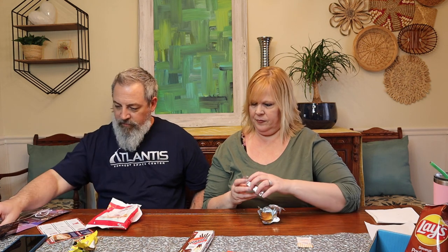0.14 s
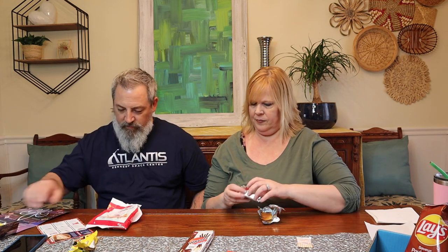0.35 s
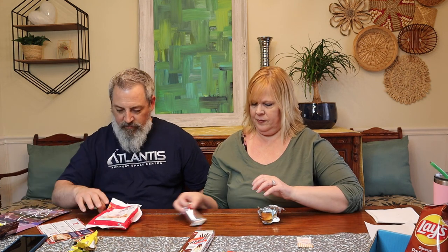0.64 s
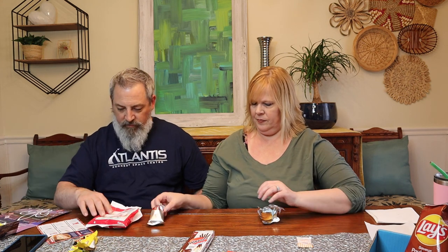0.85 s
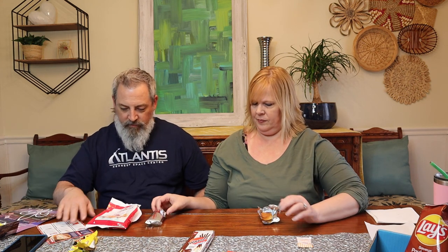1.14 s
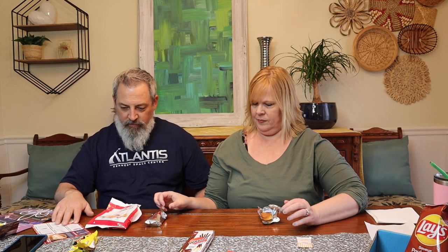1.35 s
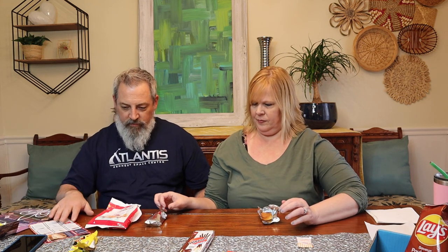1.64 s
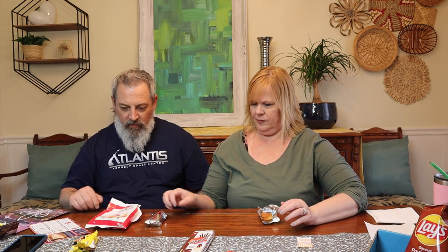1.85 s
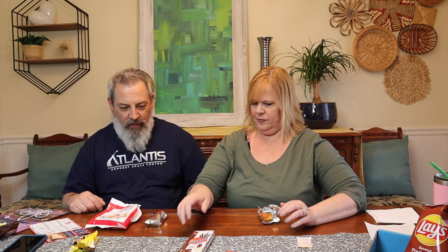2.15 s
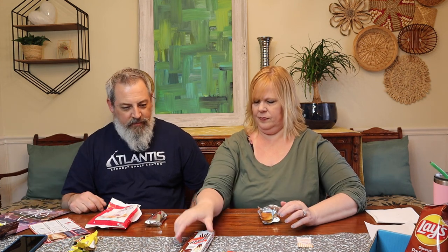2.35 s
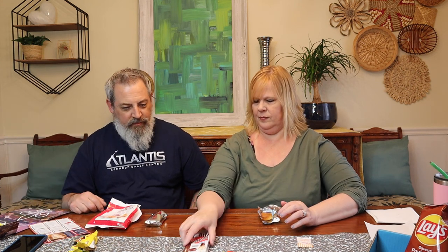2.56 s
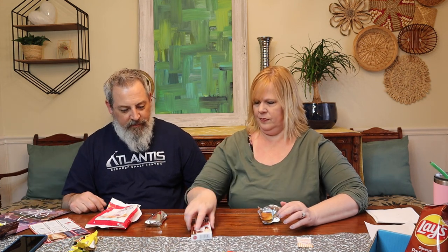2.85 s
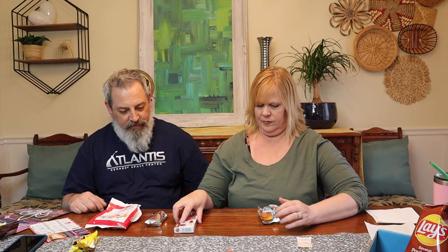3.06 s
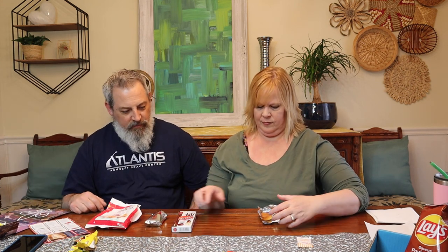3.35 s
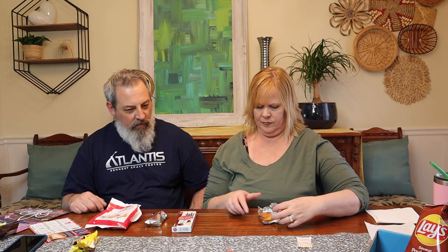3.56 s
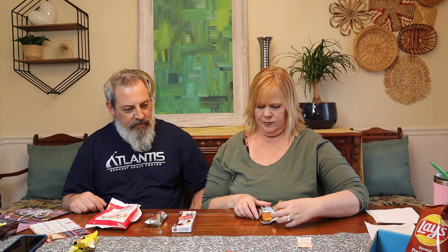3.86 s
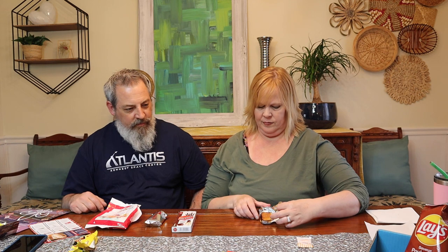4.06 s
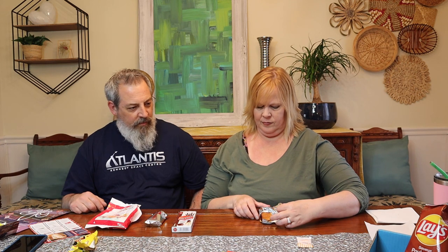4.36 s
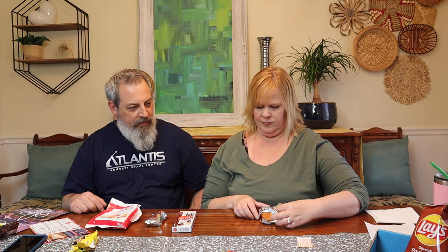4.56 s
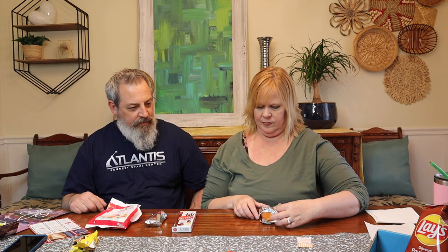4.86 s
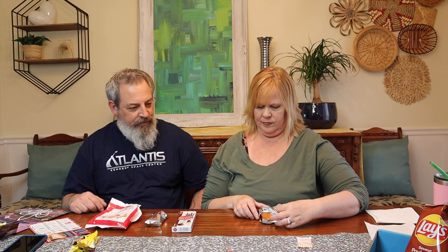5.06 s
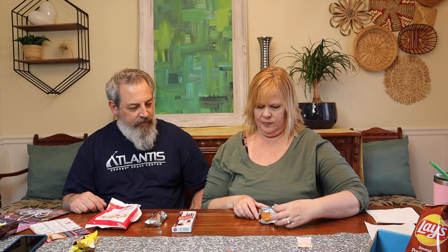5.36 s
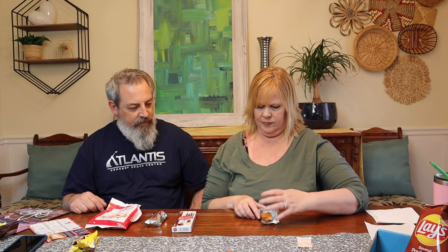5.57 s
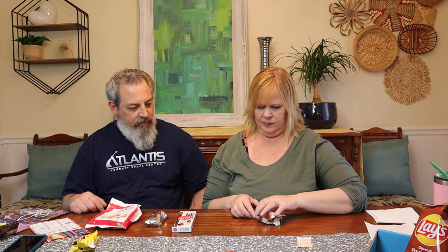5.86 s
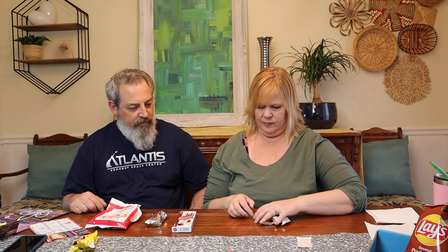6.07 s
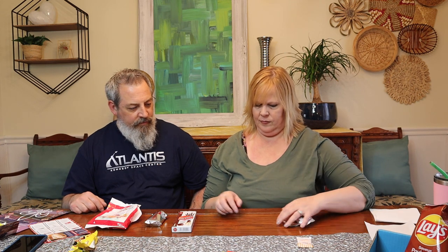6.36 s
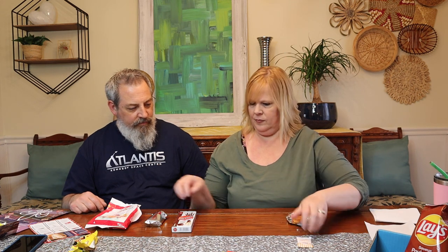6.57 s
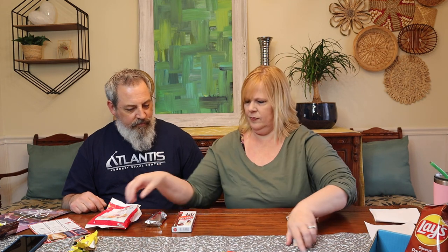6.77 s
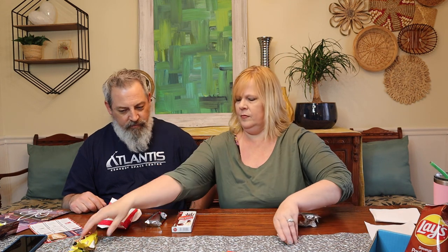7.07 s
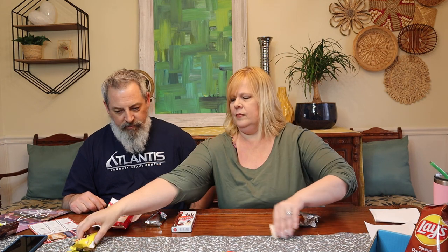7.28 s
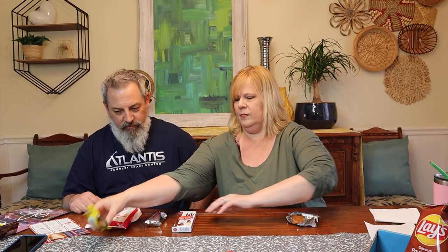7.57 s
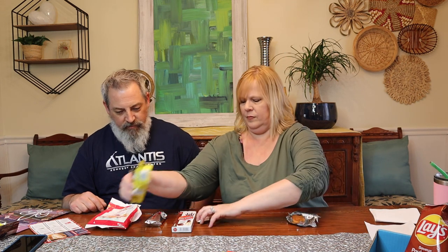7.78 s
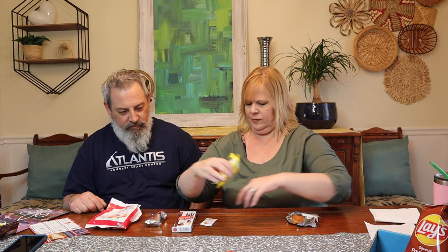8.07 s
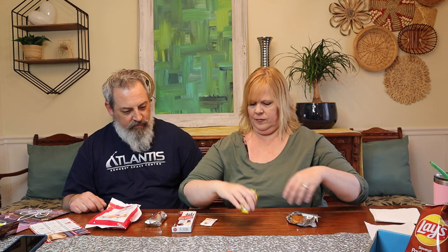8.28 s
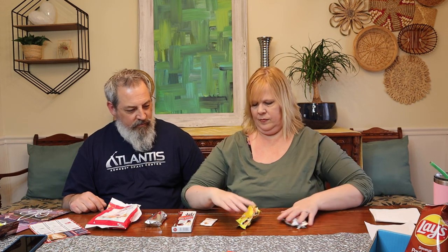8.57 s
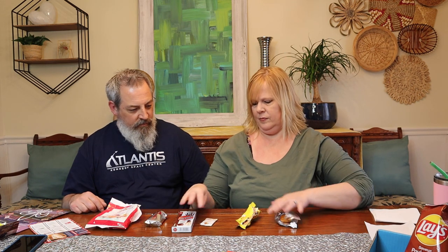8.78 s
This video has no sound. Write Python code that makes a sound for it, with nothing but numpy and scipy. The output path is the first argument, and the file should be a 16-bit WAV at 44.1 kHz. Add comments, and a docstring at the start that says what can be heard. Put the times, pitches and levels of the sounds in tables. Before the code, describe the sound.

Foil and plastic snack wrappers crackle and snap in bursts at a wooden table, with small thuds, a packet slide and quiet room hum.

```python
"""Snack wrappers of plastic and foil are handled at a wooden table, a few steps from a mono microphone.
Creases snap as short ringing facets over a crackle of filtered noise bursts; taut foil rings on faintly.
Packets slide as dense friction grains, and packets and hands land on the table top, ringing its modes.
The small room answers with echoes and a noise tail; mains hum and ventilation stay underneath."""
import sys
import numpy as np
from scipy import signal
from scipy.fft import rfft, irfft, next_fast_len
from scipy.io import wavfile
from scipy.ndimage import map_coordinates

SR = 44100
rng = np.random.default_rng(int(sys.argv[2]) if len(sys.argv) > 2 else 0)


def waveform_to_disk(signal):
    """Save audio, clipped to [-1, 1], as 16-bit WAV at the path in sys.argv[1]."""
    frames = np.transpose(np.atleast_2d(signal))
    scaled = np.clip(frames, -1, 1) * 32767
    samples = np.round(scaled).astype(np.int16)
    wavfile.write(sys.argv[1], SR, samples)


N = 392931

# spectrum of the wrapper sheet: f/Hz, level/dB
FILM_SPECTRUM = [(700, -11.5), (1400, -2), (2400, -1), (3400, 1.5), (4300, -4), (5200, -4), (6500, -22.5),
                 (8000, -52)]
# spectrum of the wrapper's treble: f/Hz, level/dB
CRISP_SPECTRUM = [(5000, 0), (7000, -5), (10000, -6), (14500, -7.5), (15700, -18), (16200, -45)]
# spectrum of the packet body, also heard from the table under a slide: f/Hz, level/dB
BODY_SPECTRUM = [(150, -11.5), (300, -4.5), (450, 1.5), (650, 2.5), (830, 5.5), (1050, 0), (1500, -18)]
# spectrum of a dragged surface, also of the edge of a landing: f/Hz, level/dB
DRAG_SPECTRUM = [(900, -8), (1300, 1), (3600, 0.5), (4400, -4.5), (5000, -1), (6500, -12), (12300, -16.5),
                 (15700, -22), (16000, -60)]


def amp(db):
    """Gain of a dB value."""
    return 10 ** (np.asarray(db) / 20)


def unit(x):
    """Scaled to rms 1."""
    return x / np.sqrt(np.mean(x ** 2) + 1e-20)


def peak(x):
    """Scaled to peak 1."""
    return x / np.abs(x).max()


def noise():
    """White noise for the whole scene."""
    return rng.standard_normal(N)


def along(points, hz):
    """Values read between (f/Hz, value) points on a log frequency axis."""
    f, v = np.transpose(points)
    return np.interp(np.log(hz + 1), np.log(f + 1), v)


def curves(tables):
    """One value per sample for each column after the time; the first falls to -100 dB between tables."""
    rows = []
    for table in tables:
        first, last = np.array(table[0], float), np.array(table[-1], float)
        first[:2] = first[0] - .02, -100
        last[:2] = last[0] + .02, -100
        rows += [first, *table, last]
    s, *columns = np.transpose(np.array(rows, float))
    return [np.interp(np.arange(N) / SR, s, column) for column in columns]


def wobble(rate):
    """A smooth random curve through rate random knots a second."""
    knots = rng.standard_normal(int(N * rate / SR) + 4)
    return map_coordinates(knots, [np.arange(N) * rate / SR])


def coloured(x, spectrum):
    """x through a (f/Hz, level/dB) spectrum, silent outside it, brought to rms 1."""
    m = next_fast_len(N + 8192)
    hz = np.fft.rfftfreq(m, 1 / SR)
    inside = (hz > spectrum[0][0]) & (hz < spectrum[-1][0])
    return unit(irfft(rfft(x, m) * amp(along(spectrum, hz)) * inside, m)[:N])


def crackle(count, spread_db, clump_db, bed_db, life):
    """Short noise bursts of uneven size and life seconds, in clumps, over a bed of noise."""
    at, chance = rng.random((2, count))
    size = amp(spread_db * np.minimum(-np.log(chance), 3))
    strikes = np.bincount((at * N).astype(int), size, N)
    bursts = signal.lfilter([1], [1, -np.exp(-1 / (life * SR))], strikes)
    return amp(clump_db * wobble(45)) * (unit(bursts) + amp(bed_db)) * noise()


def background():
    """Ventilation and microphone hiss, a slightly unsteady hum and a slow low rumble."""
    # ventilation and hiss: f/Hz, level/dB
    air_spectrum = [(44, -42), (75, -15), (107, -8.5), (251, -10), (314, -10), (481, -12.5), (673, -16),
                    (842, -11.5), (1350, -22), (3370, -26.5), (3770, -24), (4930, -27.5), (12400, -31.5),
                    (15800, -32)]
    rumble_spectrum = [(15, 0), (28, 0), (36, -8), (55, -14)]  # f/Hz, level/dB
    hum_hz = 60
    air = amp(-55.5 + 0.17 * wobble(3.1)) * coloured(noise(), air_spectrum)
    hum = amp(-54.5 + 0.9 * wobble(8.1)) * np.sin(2 * np.pi * hum_hz * np.arange(N) / SR)
    rumble = amp(-66 + 3 * wobble(2.5)) * coloured(noise(), rumble_spectrum)
    return air + hum + rumble


def room(x, wet_db):
    """Early echoes and a tail dying by frequency, weaker in the bass; the hands move, so it keeps changing."""
    # decay time of the tail: f/Hz, t60/s
    decay = [(100, 0.51), (500, 0.47), (1400, 0.47), (3700, 0.36), (7000, 0.29), (15000, 0.11)]
    # early echoes off the walls, each delay varied by up to a tenth: t/s, level/dB
    echoes = [(.0022, -15.5), (.0054, -31), (0.0113, -24)]
    out, step = np.zeros(N + 2 * SR), SR // 4  # a new answer every quarter second
    for start in range(0, N, step):
        hz, t, z = signal.stft(rng.standard_normal(SR // 2), SR, nperseg=256)
        hz = hz[:, None]
        tilt_db = 0.5 * np.log2(hz / 2000 + 0.23)
        tail = signal.istft(z * amp(tilt_db - 60 * t / along(decay, hz)), SR, nperseg=256)[1]
        tail = np.pad(amp(wet_db) * tail / np.linalg.norm(tail), (100, 0))  # starts 100 samples late
        for s, db in echoes:
            tail[round(s * SR * rng.uniform(.9, 1.1))] += amp(db)
        answer = signal.fftconvolve(x[start:start + step], tail)
        out[start:start + len(answer)] += answer
    return out[:N]


def slides():
    """Packet or arm dragged over the table: dense friction grains excite the surface and the table."""
    # one list of points a slide: t/s, hiss level/dB, table body level/dB over the hiss
    drags = [
        [(1.82, -83, -5.5), (1.93, -56, -13), (1.99, -52.5, 2), (2.1, -60, 1.5), (2.33, -68, -5)],
        [(2.53, -58.5, 5), (2.56, -50.5, -3), (2.7, -48.5, -4), (2.83, -43.5, -9), (2.9, -42.5, -6.5),
         (3.0, -42.5, -11), (3.05, -40, 2.5), (3.2, -54, 2)],
    ]
    hiss_db, body_db = curves(drags)
    grains = crackle(count=30000, spread_db=2.5, clump_db=.8, bed_db=4, life=.0003)
    hiss = coloured(grains, DRAG_SPECTRUM)
    table_body = amp(body_db) * coloured(grains, BODY_SPECTRUM)
    return amp(hiss_db) * (hiss + table_body)


def knocks():
    """Each landing rings the modes near its centre; its weight drives the low table modes, its edge cracks."""
    # things landing on the table: t/s, peak level of the ring/dB, centre of the excited modes f/Hz, weight/dB
    landings = [(0.0256, -20.5, 594, 19), (0.1277, -23, 864, 15), (.38, -27, 443, -27),
                (1.229, -22, 950, 3), (1.973, -37, 304, 14), (2.0203, -35, 260, 5), (2.046, -35.5, 150, -9),
                (2.086, -39.5, 170, -16), (2.831, -28, 517, -9), (2.845, -28, 700, -2),
                (3.012, -14, 724, 6), (3.0228, -22, 830, -19), (3.052, -25.5, 382, -12),
                (3.2287, -28, 523, -34), (4.036, -31, 1000, -22), (6.0291, -32, 850, -17),
                (6.7334, -32, 183, -33), (6.799, -39, 169, -13), (6.839, -40, 200, -3), (6.88, -40, 180, 2),
                (7.2329, -33.5, 870, -9), (7.32, -23.5, 796, -30), (7.497, -25.5, 650, -36),
                (7.5178, -25, 860, -29), (7.5948, -24, 970, -34), (8.4508, -9.5, 600, -18),
                (8.485, -22.5, 420, -13), (8.587, -26.5, 833, -8)]
    # modes of table top and packets, level and pitch varied a little each time: f/Hz, level/dB, t60/s
    modes = [(95, 3, 0.24), (146, 5, 0.06), (237, 5, 0.11), (306, -10, 0.23), (383.5, -2.5, 0.21),
             (463, 11.5, 0.048), (614.4, 5.5, 0.17), (687, 16, 0.033), (852, 20, 0.039), (979, 3, 0.15),
             (1254, 15.5, 0.026)]
    contact_cycles = 0.3  # build-up time constant, in cycles of the centre
    slap_db, slap_cycles = -4, 0.8  # first contact pushes the air once: level over the ring, length
    out, t = np.zeros(N), np.arange(SR // 4) / SR
    hz, level_db, t60 = np.transpose(modes)[..., None]
    sign = (-1) ** np.arange(len(modes))[:, None]  # neighbouring modes ring with opposite signs
    edge = coloured(noise(), DRAG_SPECTRUM)
    for s, db, centre_hz, weight_db in landings:
        at = round(s * SR)
        near_centre = amp(-9 * np.log2(hz / centre_hz) ** 2)
        low_modes = amp(weight_db - 9 * np.log2(hz / 250) ** 2)
        share = sign * (near_centre + low_modes) * amp(level_db + rng.normal(0, 2.5, hz.shape))
        detune = rng.normal(1, .02, hz.shape)
        ring = (share * amp(-60 * t / t60) * np.sin(2 * np.pi * hz * detune * t)).sum(0)
        ring = peak(ring * (1 - np.exp(-t * centre_hz / contact_cycles)))
        slap = np.sin(2 * np.pi * centre_hz * t) * np.exp(-(t * centre_hz / slap_cycles) ** 2)
        # higher-pitched landings crack louder
        crack_db = -11.5 + 13.5 * np.log2(centre_hz / 800) - 60 * t / 0.025
        crack = amp(crack_db) * edge[at:][:len(t)]
        out[at:][:len(t)] += amp(db) * (ring + crack + amp(slap_db) * slap)
    return out


def tings():
    """A flicked patch of foil holds one tone for a moment, its level flickering as it dies."""
    # taut foil: t/s, level/dB before the flicker, f/Hz, t60/s
    patches = [(4.445, -57, 3960, 0.18), (4.4445, -57, 4760, .15)]
    t, out = np.arange(N) / SR, np.zeros(N)
    for s, db, hz, t60 in patches:
        level = amp(db + 4 * wobble(60) - 60 * abs(t - s) / t60) * (t > s)
        out += level * np.sin(2 * np.pi * hz * (t - s))
    return out


def handling():
    """Gains over time of the sheet, its treble and the packet body; overlapping grips add in power."""
    # each grip on a wrapper: strongest at t/s, swell/s and fade/s across the grip range,
    # crackle level/dB, then crispness level/dB and packet body level/dB over the crackle
    grips = [(0.032, 0.0091, 0.12, -44, -25, 16.5), (0.138, 0.041, 0.052, -32.5, -15, 3),
             (0.249, 0.054, 0.14, -33.5, -8.5, -10), (0.33, 0.046, 0.08, -40.5, -7, -4),
             (0.425, 0.064, 0.17, -41, -18, -0.5), (0.505, 0.12, 0.15, -37, -7.5, -6.5),
             (0.652, .01, .15, -47, -16, -3), (0.704, 0.067, 0.11, -36.5, -12.5, -11.5),
             (0.863, 0.14, 0.29, -38.5, -10, -7), (1.055, 0.59, 0.24, -53.5, -12, -3),
             (1.1, 0.039, 0.28, -47.5, -9, -1.5), (1.235, 0.0067, 0.078, -39.5, -14, 8.5),
             (1.367, .15, 0.37, -53, -10, -5), (3.738, 0.097, 0.12, -49, -1.5, -9),
             (3.846, 0.088, 0.088, -47.5, -3, -7), (4.45, 0.044, 0.063, -55, -16, 4),
             (5.425, 0.019, 0.12, -43, -9, -6.5), (5.457, 0.033, 0.052, -40, -4, -15),
             (5.559, 0.24, 0.16, -54, -12, -3), (5.833, 0.025, .5, -49.5, -4.5, -4.5),
             (6.035, 0.2, .15, -44, -7, -4), (6.122, 0.1, 0.17, -42, -8, -3.5),
             (6.464, 0.46, 0.15, -44.5, -7.5, -8), (6.715, 0.012, 1, -53.5, -8, -4),
             (7.001, 0.49, 0.21, -51.5, -4.5, -5.5), (7.339, 0.11, 0.15, -37, -10.5, -4.5),
             (7.528, 0.061, 0.063, -41.5, -32, -1), (7.604, 0.061, 0.067, -46.5, -5, -10),
             (7.752, 0.042, 0.28, -45.5, -12, -5.5), (7.833, 0.087, .15, -48, -7, -3),
             (7.916, 0.037, 0.11, -39, -8.5, -22), (8.0, 0.088, 0.19, -48, -19, -4),
             (8.245, 0.17, 0.59, -61.5, -12, -3), (8.457, 0.0055, 0.053, -45.5, -15, 24),
             (8.5, 0.069, 0.36, -45, -9, -10), (8.589, 0.049, 0.25, -36.5, -7, -2.5),
             (8.78, .008, 0.059, -45, 3.5, -9), (8.796, 0.048, 0.066, -41.5, -10, -10)]
    grip_range_db = 20
    power, t = np.zeros((3, N)), np.arange(N) / SR
    for s, swell, fade, db, crisp_db, body_db in grips:
        away = np.maximum((s - t) / swell, (t - s) / fade)
        parts = amp([[0], [crisp_db], [body_db]])
        power += parts ** 2 * amp(db - grip_range_db * away) ** 2
    return np.sqrt(power)


def film(sheet, crisp, body):
    """Countless small folds crackle; each shakes the sheet, its treble and the packet body together."""
    folds = crackle(count=5000, spread_db=3.5, clump_db=2.5, bed_db=-1.5, life=.0006)
    packet = coloured(unit(folds) + 1.4 * noise(), BODY_SPECTRUM)  # the body also gets steadier noise
    return sheet * coloured(folds, FILM_SPECTRUM) + crisp * coloured(folds, CRISP_SPECTRUM) + body * packet


def small_snaps(sheet):
    """Lesser creases give way at chance moments, as strong as the grip on the wrapper."""
    count, over_crackle_db = 400, 16
    facet_hz, facet_spread_oct = 3920, 0.57
    click_db, click_spread_db = -10, 5
    at = rng.random(count) * (N - SR // 20)
    pitch, click = rng.standard_normal((2, count))
    db = 20 * np.log10(sheet[at.astype(int)] + 1e-9) + over_crackle_db
    hz = facet_hz * 2 ** (facet_spread_oct * pitch)
    return np.transpose([at / SR, db, hz, click_db + click_spread_db * click])


def snaps(creases):
    """A crease buckles: its facet rings a few cycles while the sheet around it cracks, with a treble click."""
    out, t = np.zeros(N), np.arange(SR // 50) / SR
    sheet, treble = coloured(noise(), FILM_SPECTRUM), coloured(noise(), CRISP_SPECTRUM)
    onset = 1 - np.exp(-t / .0001)  # the fold gives way within a fraction of a millisecond
    for s, db, hz, click_db in creases:
        at = round(s * SR)
        neighbour = 0.42 * np.sin(2 * np.pi * hz * rng.uniform(0.43, 0.91) * t)  # the larger facet beside it
        facet = (np.sin(2 * np.pi * hz * t) + neighbour) * np.exp(-t * hz / 1.84)
        facet = facet * rng.choice([-1, 1])  # buckles either way
        crack = peak(sheet[at:][:len(t)] * np.exp(-t / 0.0022))
        click = peak(treble[at:][:len(t)] * np.exp(-t / 0.00077))
        out[at:][:len(t)] += amp(db) * onset * (facet + 0.33 * crack + amp(click_db) * click)
    return out


def scene():
    """All sources in one room, heard alike in both channels; small sources radiate little bass."""
    # creases buckling: t/s, level/dB, pitch of the facet f/Hz, treble click level/dB over the crease
    large_snaps = [(0.0263, -15, 4170, -17), (0.029, -5, 3530, -21), (0.18, -18, 3060, -16),
                   (0.2388, -7, 3000, -12), (0.2461, -11.5, 3320, -4.5), (0.258, -22, 2500, -5),
                   (0.2888, -14, 2980, 1.5), (0.3438, -19, 4770, -12), (0.4038, -14, 4770, -7),
                   (0.4211, -14, 3040, -2.5), (0.441, -13.5, 4930, -4), (0.46, -14.5, 4550, -5),
                   (0.4992, -12, 4700, -9), (0.539, -17, 3130, -14), (0.5464, -16, 3000, -2),
                   (0.6537, -28.5, 2890, -4), (0.6993, -19, 2650, -23), (0.8378, -21, 2190, -6),
                   (0.8578, -16, 3550, -2.5), (0.9284, -20, 2700, -13), (0.9724, -25.5, 3340, 0.5),
                   (0.9934, -23.5, 3250, -3.5), (1.082, -23, 6550, -2.5), (1.2292, -16, 2400, -32),
                   (1.2349, -24.5, 1540, -5), (1.282, -39, 7200, 7), (1.366, -36, 5200, -14),
                   (2.614, -29, 4800, -10), (3.0171, -25.5, 2590, 4), (3.2308, -13, 5140, -12),
                   (3.7319, -25.5, 6650, 7.5), (3.817, -28, 4600, -5), (3.823, -24, 3780, -2),
                   (3.866, -28, 5200, -9), (3.952, -37, 5200, -15), (4.0375, -27, 2190, 3.5),
                   (4.135, -39, 2630, -15), (4.35, -36.5, 6030, 0.5), (4.385, -37.5, 4200, 0.5),
                   (4.4455, -29.5, 4100, -2), (4.785, -41, 2490, -25), (5.4152, -27.5, 3800, 0.5),
                   (5.4467, -28, 2540, 0), (5.531, -28, 4000, 0), (5.55, -28, 4070, 4),
                   (5.704, -32.5, 4610, -25), (5.8246, -26, 2600, -5), (5.831, -23.5, 5380, -12),
                   (5.8972, -26, 5400, 7), (5.9535, -26.5, 3770, -3), (5.9595, -17.5, 4000, -6.5),
                   (6.028, -30, 3500, -8), (6.0305, -11.5, 5130, -5.5), (6.0505, -23, 2670, -6),
                   (6.0626, -18.5, 3080, -11), (6.0829, -21, 4170, -18), (6.087, -14.5, 4300, -14),
                   (6.0938, -23, 4760, -6), (6.107, -22, 2450, 0), (6.1174, -14.5, 3480, -5),
                   (6.127, -24, 3300, 0), (6.1684, -22, 4160, -9), (6.183, -24.5, 3537, 5.5),
                   (6.2687, -26.5, 5400, 4), (6.3145, -31, 5000, 1), (6.34, -26, 6400, 1),
                   (6.3418, -30, 5000, -8), (6.3517, -18, 4800, -2), (6.4008, -30, 4000, -7),
                   (6.4188, -10, 4230, -11), (6.4586, -25, 2540, 3.5), (6.4788, -31, 5000, 4),
                   (6.4977, -20.5, 3520, 0.5), (6.556, -29, 3980, -5), (6.7135, -31.5, 1740, -4),
                   (6.95, -20, 5170, -6.5), (6.9943, -21.5, 5770, -5), (7.0898, -18.5, 3500, -14),
                   (7.2093, -17.5, 4740, -15), (7.2325, -25.5, 5800, 5.5), (7.267, -8.5, 5400, -11),
                   (7.2833, -13.5, 4900, -1.5), (7.3186, -20, 3620, 3), (7.328, -17.5, 3620, -4),
                   (7.3414, -15, 3760, 4), (7.3796, -14.5, 3530, -40), (7.433, -26.5, 5030, 1),
                   (7.5177, -33, 2010, -15), (7.5948, -18.5, 4550, 8), (7.7445, -12.5, 4800, -16.5),
                   (7.7671, -20.5, 4815, -13.5), (7.8092, -12, 5240, -11.5), (7.8219, -6, 5400, -10.5),
                   (7.8368, -10.5, 4650, -1.5), (7.9061, -11, 2150, -1), (7.9103, -13.5, 3400, -28.5),
                   (8.0087, -28, 2560, -8), (8.0547, -23, 2150, -31), (8.1401, -33, 2330, -3),
                   (8.1953, -21.5, 5460, -13), (8.4345, -27, 3660, -13), (8.444, -27, 5200, -17.5),
                   (8.4678, -14, 3060, -16), (8.5194, -26, 4220, -8), (8.5304, -20.5, 3560, 2.5),
                   (8.5649, -15, 3480, -17), (8.582, -24, 3660, -8), (8.5874, -10.5, 3330, -8),
                   (8.6167, -15.5, 3530, -8), (8.6427, -13.5, 2510, -5.5), (8.8164, -23, 3480, 2.5)]
    sheet, crisp, body = handling()
    wrappers = film(sheet, crisp, body) + snaps([*large_snaps, *small_snaps(sheet)]) + tings()
    near = wrappers + knocks() + slides()
    near = signal.sosfilt(signal.butter(2, 100, "high", fs=SR, output="sos"), near)
    mono = near + room(near, wet_db=-8.0) + background()
    return np.array([mono, mono])


def record(dry):
    """A small constant offset, and nothing above the band limit."""
    offset, top_hz = .0004, 16990
    m = next_fast_len(N + 8192)
    passed = np.fft.rfftfreq(m, 1 / SR) < top_hz
    return irfft(rfft(dry + offset, m) * passed, m)[:, :N]


dry = scene()
out = record(dry)
waveform_to_disk(out)
```